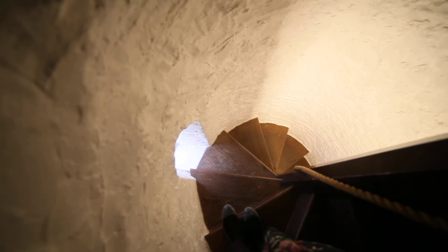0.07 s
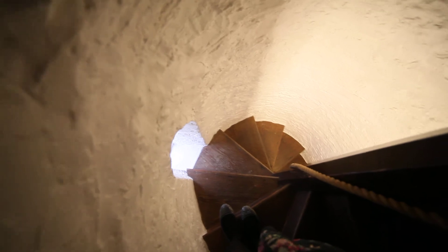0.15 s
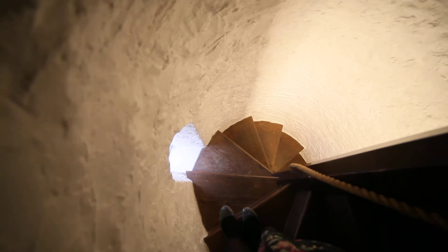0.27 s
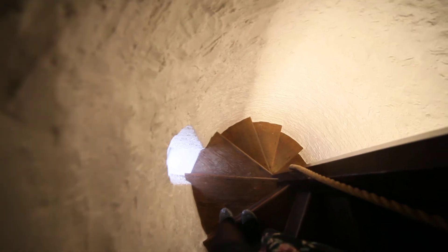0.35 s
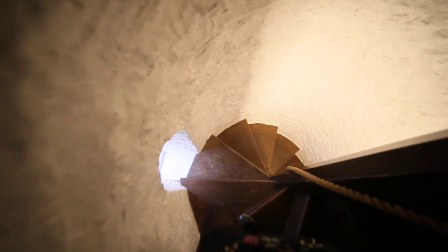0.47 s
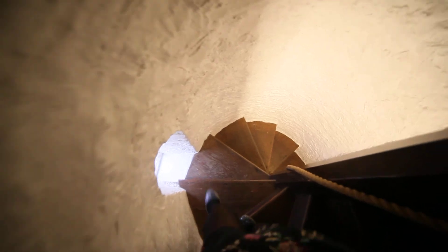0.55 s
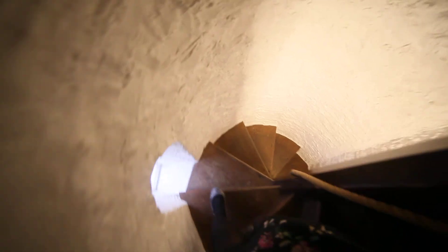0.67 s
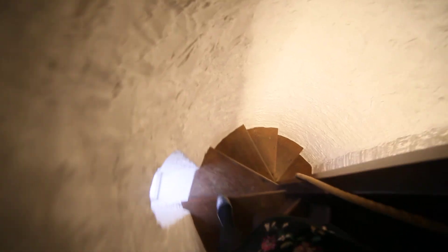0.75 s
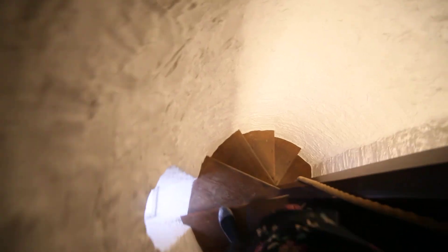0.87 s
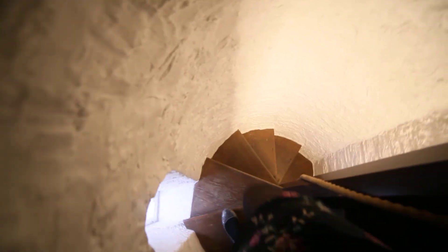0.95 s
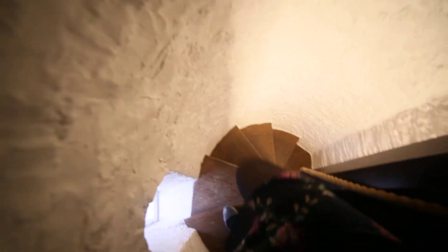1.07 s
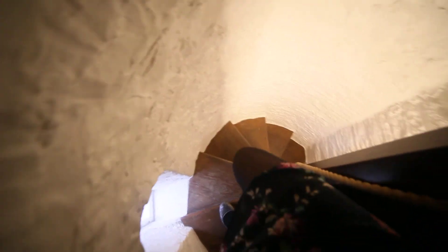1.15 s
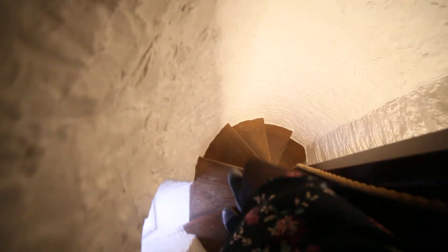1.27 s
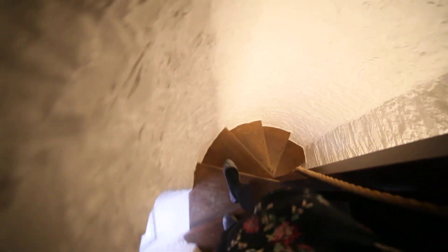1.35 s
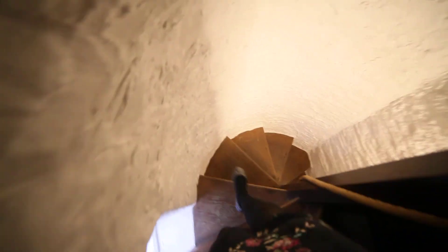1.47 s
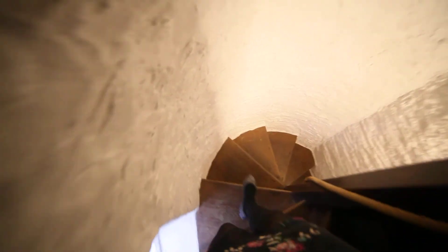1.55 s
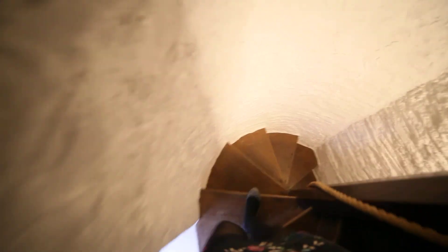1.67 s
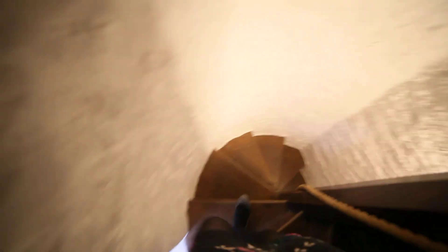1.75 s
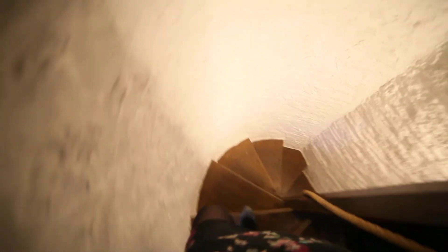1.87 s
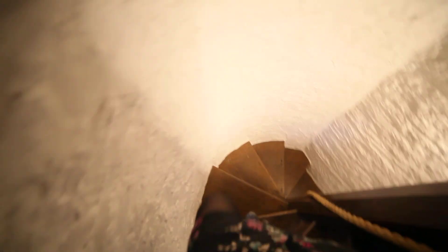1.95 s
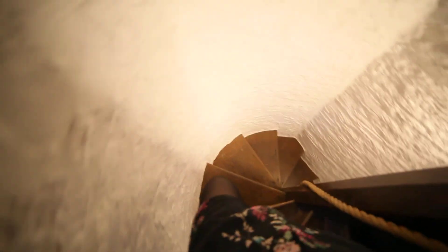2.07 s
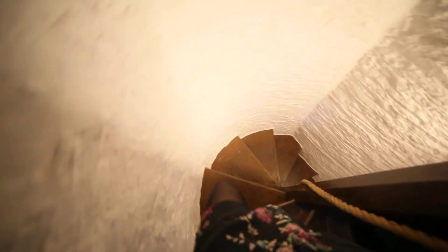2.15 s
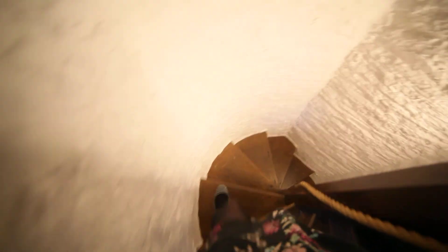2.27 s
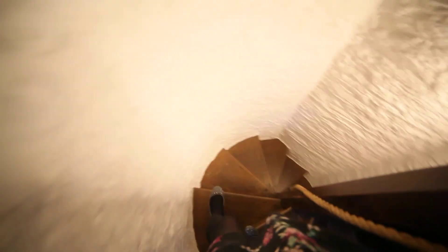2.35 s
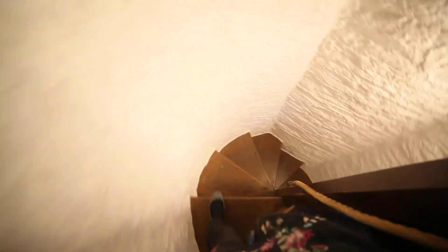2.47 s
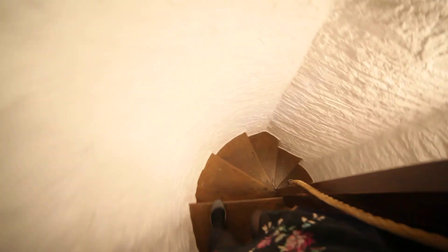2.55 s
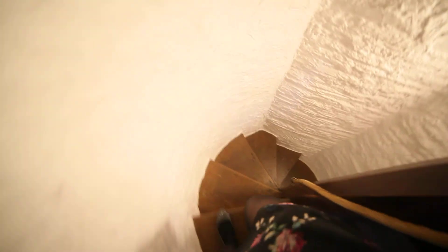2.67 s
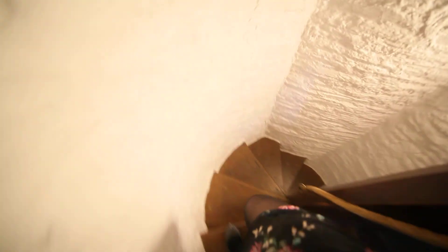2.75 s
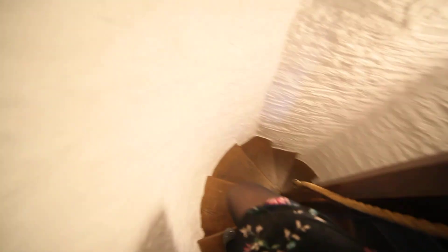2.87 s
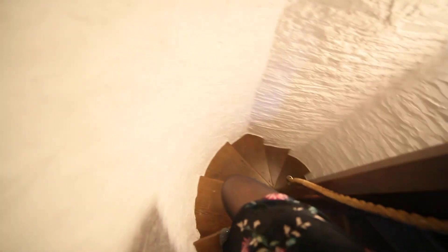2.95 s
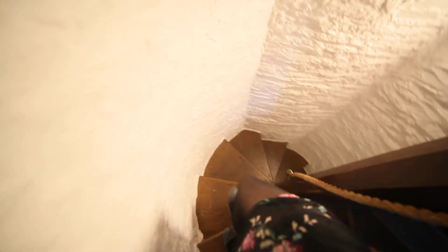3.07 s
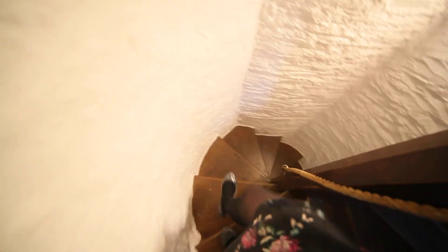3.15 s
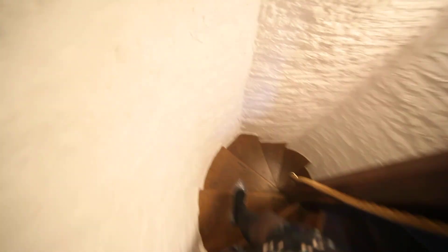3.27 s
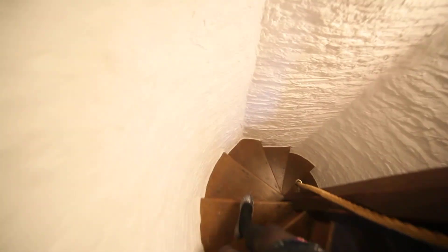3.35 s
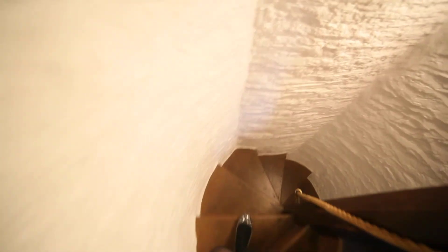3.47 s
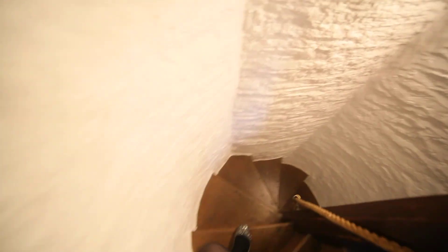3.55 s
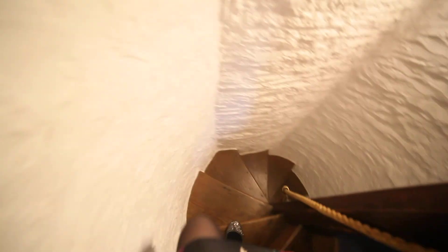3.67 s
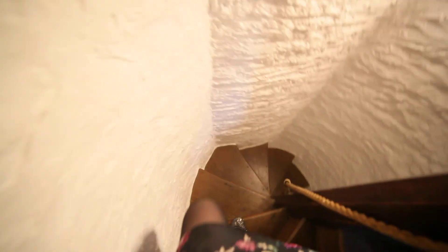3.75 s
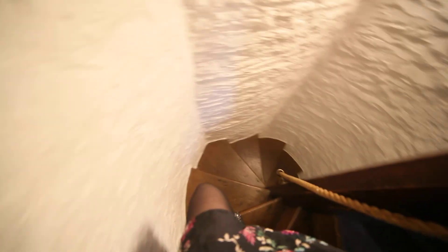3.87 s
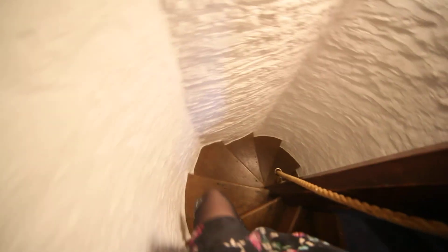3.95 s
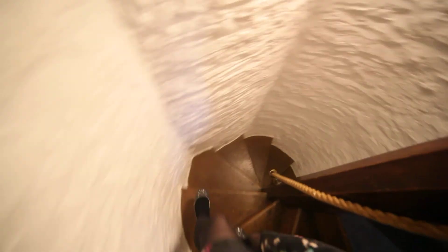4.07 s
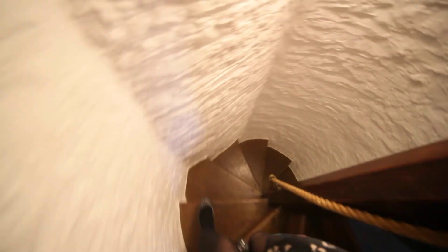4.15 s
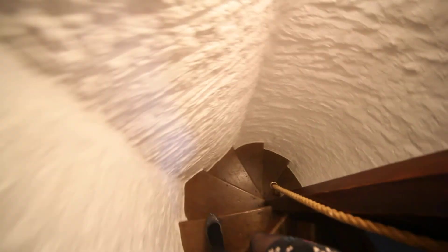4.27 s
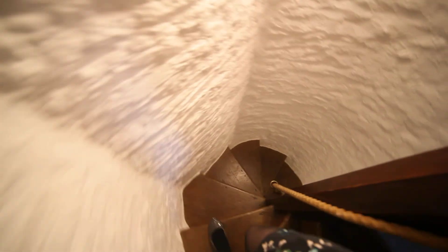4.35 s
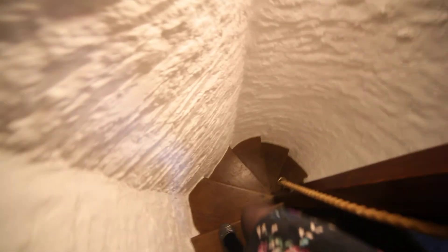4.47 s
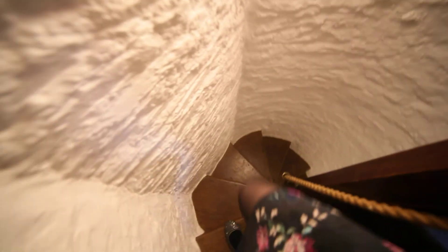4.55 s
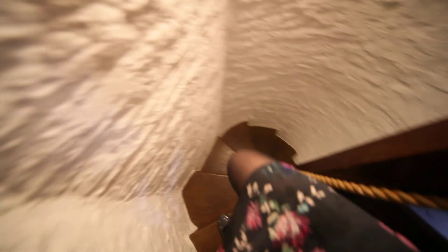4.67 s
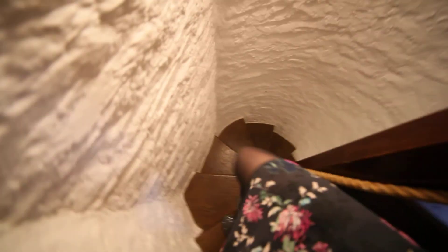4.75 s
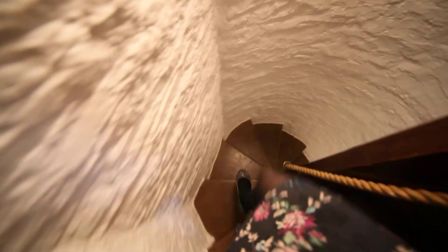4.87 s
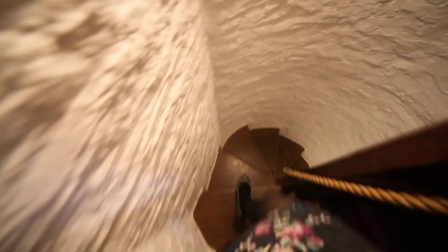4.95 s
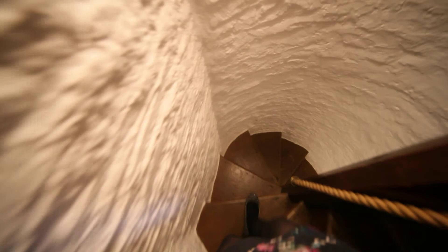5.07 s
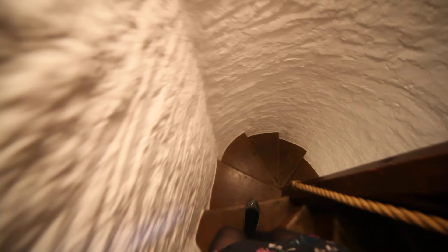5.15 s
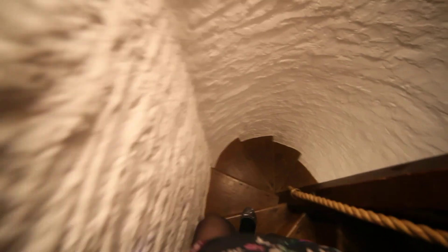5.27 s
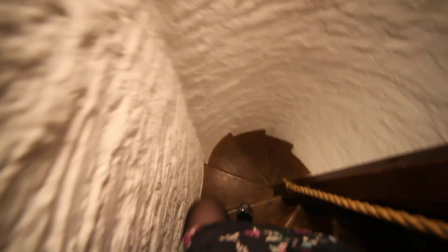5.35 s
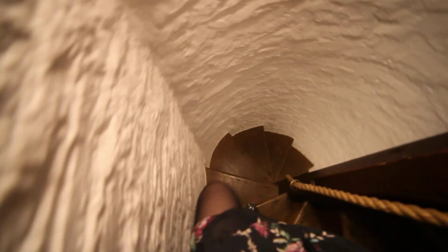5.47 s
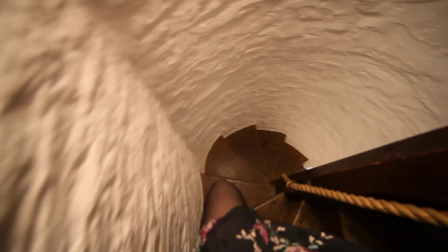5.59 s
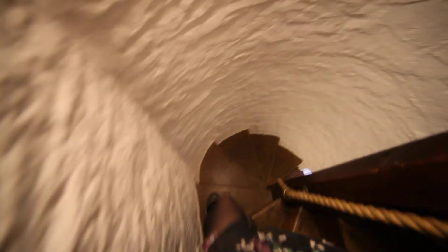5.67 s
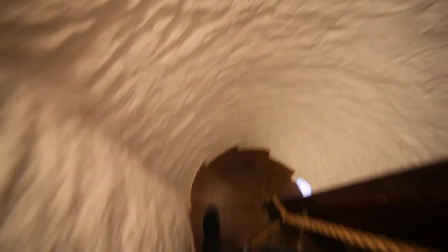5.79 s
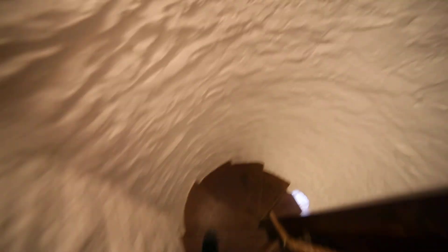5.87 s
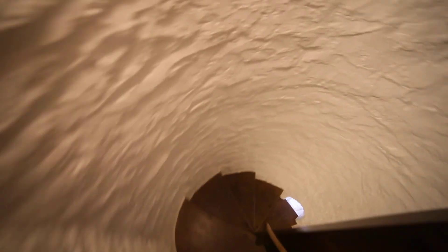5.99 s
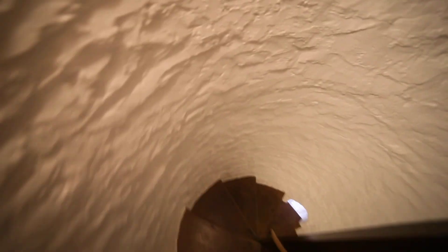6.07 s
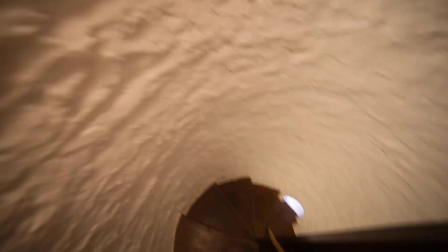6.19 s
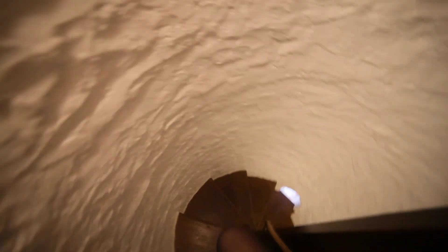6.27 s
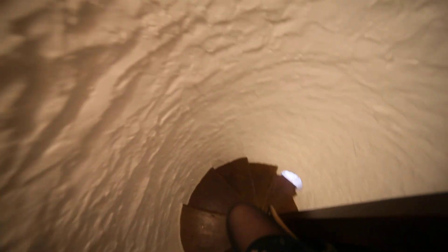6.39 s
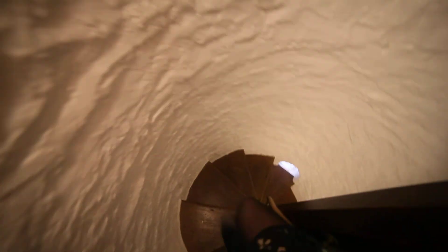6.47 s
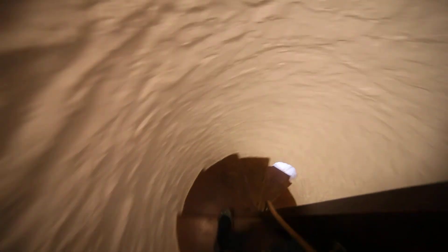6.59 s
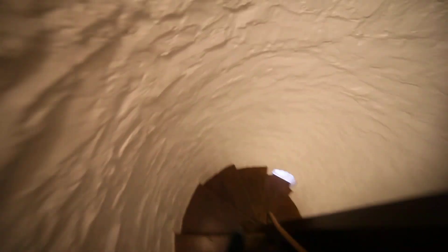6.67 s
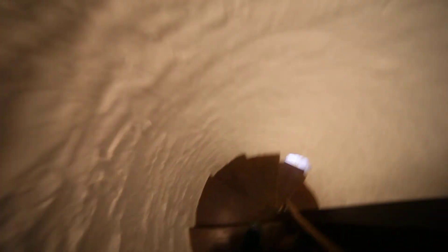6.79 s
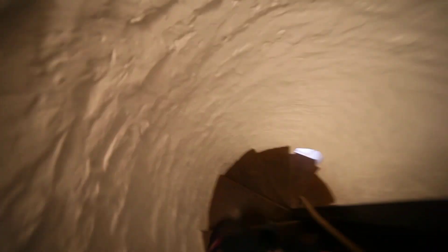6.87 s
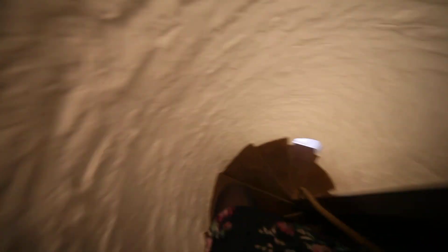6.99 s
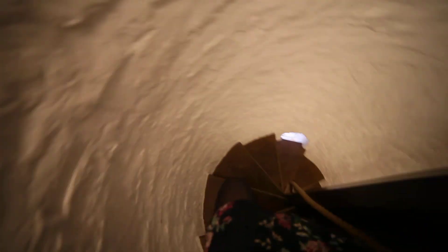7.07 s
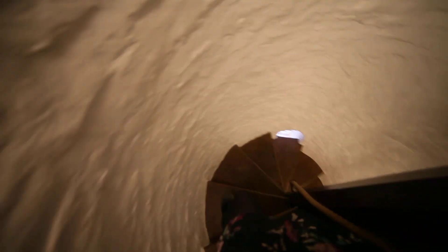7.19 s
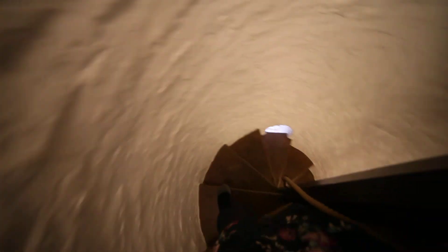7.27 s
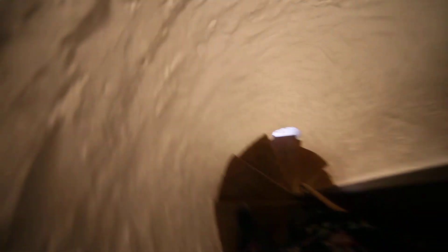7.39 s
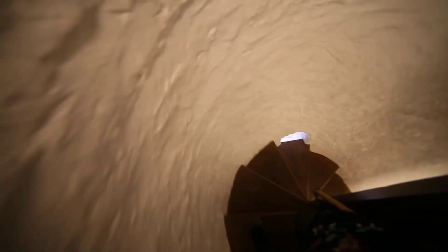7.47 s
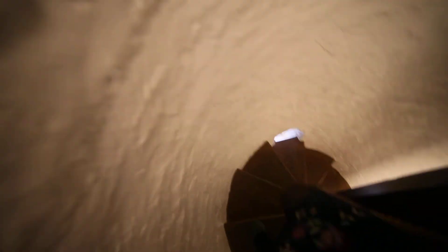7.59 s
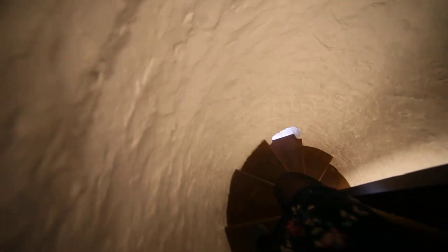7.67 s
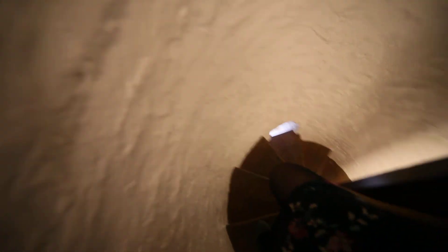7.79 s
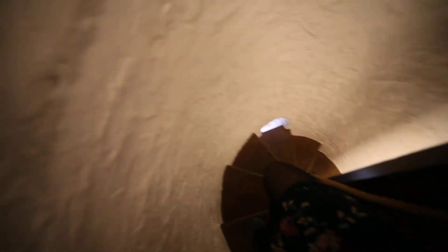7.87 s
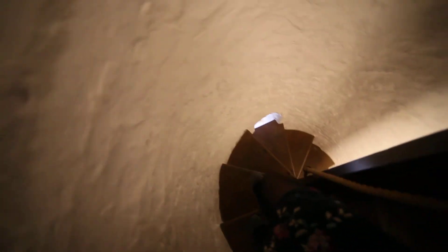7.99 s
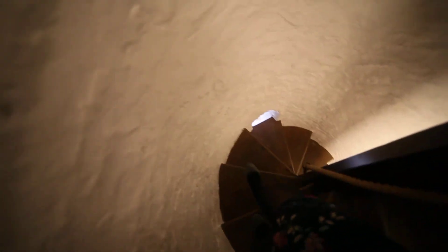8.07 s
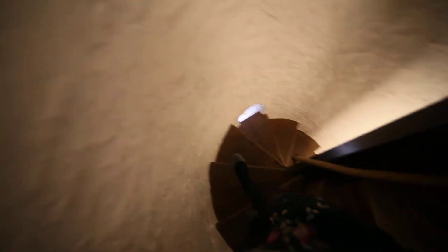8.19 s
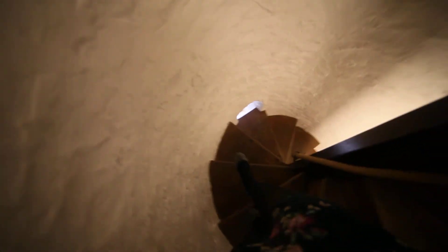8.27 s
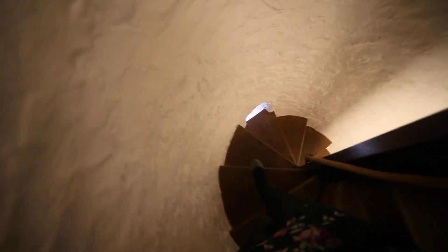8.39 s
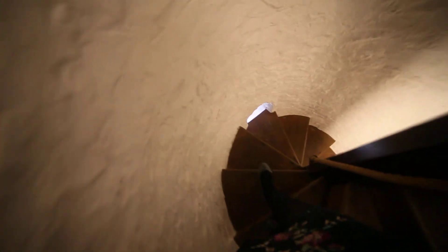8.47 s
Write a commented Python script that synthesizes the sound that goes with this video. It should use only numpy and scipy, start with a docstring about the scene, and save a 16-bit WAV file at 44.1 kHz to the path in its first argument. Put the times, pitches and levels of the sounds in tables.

```python
"""Someone walks down a wooden spiral stair in a narrow plastered tower.
First come a faint hiss, rustling clothes and two rough rubs. From 0.7 s a shoe claps onto a tread nine
times and the staircase booms; softer thuds come as the weight shifts. Along the way small things tick
close by and soles slide on the polished wood, all echoing in the tower. Just after 7 s a swinging skirt
puffs air at the microphone; the last step and one long rub end the scene."""
import sys
import numpy as np
from scipy import signal
from scipy.io import wavfile
from scipy.ndimage import uniform_filter1d

SR = 44100
rng = np.random.default_rng(int(sys.argv[2]) if len(sys.argv) > 2 else 0)


def generate_wav(sig):
    """Save sig (samples, or channels by samples) to the path in sys.argv[1] as 16-bit PCM at SR."""
    pcm = np.round(np.clip(np.atleast_2d(sig).T, -1, 1) * 32767).astype(np.int16)
    wavfile.write(sys.argv[1], SR, pcm)


N = 376169
TIME = np.arange(N) / SR
AGE = TIME[:SR]  # the first second after a blow


def amp(db):
    """Turns decibels into a number to multiply by."""
    return 10 ** (np.asarray(db) / 20)


def unit(x):
    """Scales a sound to a total energy of 1."""
    return x / np.linalg.norm(x)


def evened(x):
    """Scales a sound to an average power of 1."""
    return x / np.sqrt(np.mean(x ** 2) + 1e-20)


def struck(x, db):
    """Scales a blow so that its first 0.06 s have the level db."""
    return amp(db) * x / np.sqrt(np.mean(x[:round(0.06 * SR)] ** 2) + 1e-20)


def value_at(points, hz):
    """Reads between the rows of a (frequency, value) table."""
    freqs, values = np.transpose(points)
    return np.interp(np.log(hz + 1), np.log(freqs), values)


def add(mix, start_s, sound):
    """Mixes a sound in at the given time."""
    part = mix[max(round(start_s * SR), 0):][:len(sound)]
    part += sound[:len(part)]


def coloured(x, colour, size=8192):
    """Makes each frequency louder or softer, as a colour table says."""
    hz = abs(np.fft.fftfreq(size, 1 / SR))
    log_gain = np.log(amp(value_at(colour, hz)))
    response = np.exp(np.conj(signal.hilbert(log_gain)))  # nothing rings before the sound starts
    taps = np.fft.ifft(response).real[:size // 2]
    return signal.fftconvolve(x, taps)[:len(x)]


def band(x, hz, octaves, order=2):
    """Keeps the part of a sound around one pitch."""
    edges = np.minimum(hz * 2 ** (np.array([-.5, .5]) * octaves), SR / 2 - 1)
    return signal.sosfilt(signal.butter(order, edges, "band", fs=SR, output="sos"), x)


def friction(colour, grain_db):
    """Rubbing is countless tiny slips; more grain makes them more uneven."""
    hiss = rng.standard_normal(N)
    roughness = evened(uniform_filter1d(rng.standard_normal(N), size=90))
    return evened(coloured(hiss * amp(grain_db * roughness), colour))


def strokes(table, colour, grain_db):
    """Each rubbing stroke speeds up and slows down again."""
    speed = np.zeros(N)
    for start, length, db in table:
        add(speed, start, amp(db) * np.sin(np.linspace(0, np.pi, round(length * SR))))
    return speed * friction(colour, grain_db)


# tone colour of the background hiss: (frequency [Hz], relative level [dB])
AIR_TONE = [(20, -14), (50, -0.5), (95, -1), (140, -7), (330, -7.5), (560, -13.5), (950, -24.5),
            (1450, -21), (2200, -29), (5000, -24.5), (10000, -30.5), (15800, -37)]
def air():
    """Still air and the microphone hiss softly all the time."""
    return amp(-51) * evened(coloured(rng.standard_normal(N), AIR_TONE))


# steady rustle of the moving body: (time [s], relative level [dB])
BODY_RUSTLE = [(0, -60.5), (.4, -55.5), (.7, -53), (4, -53), (5.7, -48), (7.3, -51.5), (8.5, -53)]
# one leg reaches down, the other swings past: (time from landing [s], width [s], relative level [dB])
LEG_SWINGS = [(-.12, 0.12, -11), (0.189, 0.15, -0.5)]
# tone colour of cloth: (frequency [Hz], relative level [dB])
CLOTH_TONE = [(200, -2), (700, -2), (1600, -2.5), (3000, -5), (5000, -0.5), (7000, -2), (8500, -10.5),
              (10500, -19), (16000, -31)]
def clothes():
    """Cloth rubs faintly all the time and swells twice with each stride."""
    power = amp(np.interp(TIME, *np.transpose(BODY_RUSTLE))) ** 2
    for landing, *_, stride_db in SHOE_LANDINGS:  # listed above steps()
        for delay, width, db in LEG_SWINGS:
            swell = np.exp(-((TIME - landing - delay) / width) ** 2)
            power += amp(stride_db + db) ** 2 * swell
    return amp(-1) * np.sqrt(power) * friction(CLOTH_TONE, grain_db=1.5)


# rough rubs: (start [s], length [s], relative level [dB])
RUBS = [(.268, 0.068, -39), (.375, 0.06, -42), (1.33, 0.1, -51), (2.22, 0.14, -53), (3.145, 0.029, -42),
        (5.745, 0.097, -39), (7.88, 0.48, -40.5)]
# their tone colour: (frequency [Hz], relative level [dB])
RUB_TONE = [(100, -4.5), (330, 6), (700, -1), (1500, 4.5), (3000, 0.5), (5500, 2.5), (7500, 0),
            (10000, -17.5), (16000, -36)]
def rough_rubs():
    """Rubbing on wood and rope makes a grainy scrape."""
    return strokes(RUBS, RUB_TONE, grain_db=2)


# how long the tower echoes: (frequency [Hz], time to fade by 60 dB [s])
TOWER_FADE = [(100, 0.63), (260, 0.51), (700, 0.67), (1800, 0.59), (4800, 0.41), (9000, 0.53), (16000, 0.1)]
def tower_echo():
    """Many reflections blur into one echo; each frequency fades at its own speed."""
    hz, t, spectrum = signal.stft(rng.standard_normal(SR), SR, nperseg=256)
    fade = amp(-60 * t / value_at(TOWER_FADE, hz)[:, None])
    _, echo = signal.istft(spectrum * fade, SR, nperseg=256)
    return unit(echo[:SR])


# first echoes off the round wall: (delay [s], relative level [dB])
WALL_ECHOES = [(.003, -14), (.0062, -11), (.0095, 2), (.013, 3.5), (.024, -6)]
def sound_path(direct_db, near_fade_s, tower_db, walls_db):
    """A click reaches the listener straight, off the near walls, then round the tower."""
    scatter = (rng.random(SR) < 3000 / SR) * rng.standard_normal(SR)  # about 3000 tiny echoes a second
    near = scatter * amp(-60 * AGE / near_fade_s) * (1 - np.exp(-AGE / 0.00042))
    path = unit(near) + amp(tower_db) * tower_echo()
    path[0] += amp(direct_db)
    for delay, db in WALL_ECHOES:  # the distances change from step to step
        path[round(delay * rng.uniform(.8, 1.2) * SR)] += amp(walls_db + db)
    return path


def ring(notes, spread_db, detune):
    """Struck wood rings with fading notes; their mix varies by chance, as the foot's spot does."""
    out = np.zeros(SR)
    for hz, db, fade_s in notes:
        louder, higher, flip = rng.standard_normal(3)
        level = amp(db + spread_db * louder - 60 * AGE / fade_s)
        out += level * np.sign(flip) * np.sin(2 * np.pi * hz * (1 + detune * higher) * AGE)
    return out


def main_note(hz, path, fade_s, rise_s, echo_db):
    """The strongest note under the foot, with its echoes."""
    tone = np.sin(2 * np.pi * hz * AGE) * amp(-60 * AGE / fade_s) * (1 - np.exp(-AGE / rise_s))
    echo = signal.fftconvolve(tone, path)[:SR]
    return unit(unit(tone) + amp(echo_db) * unit(echo))


# notes of the whole staircase: (pitch [Hz], relative level [dB], time to fade by 60 dB [s])
STAIRCASE_NOTES = [(109.5, 2.5, 0.3), (118.9, -12, 0.56), (207, -6, 0.14), (147.6, -24, 0.44)]
def staircase_boom():
    """The heavy frame takes a moment to move, then booms."""
    swell = 1 - np.exp(-AGE / 0.051)
    return ring(STAIRCASE_NOTES, spread_db=4, detune=0.013) * swell


# notes of one tread: (pitch [Hz], relative level [dB], time to fade by 60 dB [s])
TREAD_NOTES = [(231, -9, 0.15), (288.7, -7, 0.25), (313, -3, 0.24), (363, -16, 0.71), (492, -9.5, 0.59),
               (559, 3.5, 0.4), (843, -25, .25), (1037, -18, 0.53), (1144, -14, 0.44), (1220, -24, 0.27),
               (2497, -33, 0.23), (2810, -2, 0.21)]
def tread_ring():
    """The tread, the board under the foot, rings when struck."""
    return unit(ring(TREAD_NOTES, spread_db=5.5, detune=0.0063))


def tread_thud(wood, hz, note_db):
    """The weight pushes on the tread: a low thud with one note in it."""
    path = sound_path(direct_db=-6, near_fade_s=0.2, tower_db=1, walls_db=-11)
    thud = unit(band(path + amp(-13) * wood, hz, octaves=0.84))
    return thud + amp(note_db) * main_note(hz, path, fade_s=0.15, rise_s=0.0032, echo_db=-7.5)


def sole_clack(wood, hz, hollow_db):
    """The sole claps onto the wood with a short, hollow ring."""
    path = sound_path(direct_db=-12, near_fade_s=0.33, tower_db=-5, walls_db=-23)
    clack = unit(band(path + amp(-10.5) * wood, hz, octaves=1.39))
    return clack + amp(hollow_db) * main_note(hz, path, fade_s=0.023, rise_s=0.0045, echo_db=1)


# tone colour of the snap: (frequency [Hz], relative level [dB])
SNAP_TONE = [(400, -64), (1200, -5.5), (2000, -0.5), (3400, -2.5), (4900, -1.5), (6300, -7), (7600, -12.5),
             (10000, -27), (16000, -48)]
def sole_snap(wood, hz):
    """Hard contact makes a bright snap, coloured by the part of the sole that lands."""
    path = sound_path(direct_db=-8, near_fade_s=0.22, tower_db=-3, walls_db=-22)
    snap = coloured(path + amp(-5.5) * wood, SNAP_TONE)
    return unit(snap) + amp(-7) * unit(band(snap, hz, octaves=0.53, order=1))


def footfall(boom_db, thud_db, thud_hz, clack_db, clack_hz, hollow_db, snap_db, snap_hz, note_db):
    """One blow: the staircase booms, the tread thuds, the sole clacks and snaps."""
    boom = struck(staircase_boom(), boom_db)
    wood = tread_ring()
    thud = struck(tread_thud(wood, thud_hz, note_db), thud_db)
    clack = struck(sole_clack(wood, clack_hz, hollow_db), clack_db)
    snap = struck(sole_snap(wood, snap_hz), snap_db + 2)
    return boom + thud + clack + snap


# a shoe lands on the next tread: (time [s], boom level [dB], thud level [dB], thud pitch [Hz],
# clack level [dB], clack pitch [Hz], hollow ring against the clack [dB], relative snap level [dB],
# snap pitch [Hz], relative rustle level [dB])
SHOE_LANDINGS = [(0.7127, -29.5, -19.5, 288, -26, 1160, -7, -28.5, 2950, -45.5),
                 (1.5969, -30, -24.5, 344, -25, 840, -19, -37, 3960, -40.5),
                 (2.512, -29.5, -25.5, 325, -19, 1040, 0.5, -30.5, 4170, -43),
                 (3.3813, -26.5, -18, 330, -25, 918, -5.5, -30.5, 4630, -45),
                 (4.2654, -29, -20.5, 314, -24, 910, -3, -29, 3600, -44.5),
                 (5.0495, -25, -24, 322, -26.5, 1040, -21, -33.5, 3400, -39),
                 (5.879, -26.5, -20, 276, -24.5, 1290, -1.5, -28, 2230, -45),
                 (6.7183, -23.5, -21.5, 215, -24, 1066, -11.5, -31.5, 2840, -43),
                 (7.4085, -34.5, -28.5, 333, -20, 1046, -4.5, -28, 2500, -44.5)]
# the weight shifts: (time [s], boom level [dB], thud level [dB], thud pitch [Hz], clack level [dB],
# clack pitch [Hz], relative snap level [dB])
WEIGHT_SHIFTS = [(0.623, -56, -48, 271, -50.5, 580, -64), (0.895, -59, -25.5, 257.5, -40, 1020, -62),
                 (1.783, -57, -35, 297.5, -57, 900, -61), (1.916, -42, -48, 280, -52, 700, -57),
                 (2.454, -54, -42.5, 385, -53, 970, -58), (2.678, -51, -25.5, 358, -32.5, 890, -46),
                 (3.57, -44.5, -34, 314, -40.5, 845, -63), (3.905, -75, -51, 300, -52.5, 570, -77),
                 (4.173, -46, -48, 287, -74, 977, -66), (4.4422, -44, -26, 363, -28, 660, -66),
                 (5.217, -46, -25, 291, -39, 830, -62), (5.379, -48.5, -38.5, 312, -43.5, 623, -57),
                 (6.014, -62, -25, 347, -27, 626, -41.5), (6.7857, -40, -18.5, 257, -32.5, 840, -33.5),
                 (6.928, -42.5, -32.5, 235, -38.5, 610, -54), (7.5722, -51.5, -22.5, 296, -29, 710, -36),
                 (7.731, -43.5, -25.5, 269, -37.5, 900, -47)]
def steps():
    """Shoes land hard on the treads, and the shifting weight adds softer thuds."""
    out = np.zeros(N)
    for start, *blow, _ in SHOE_LANDINGS:
        add(out, start, footfall(*blow, note_db=-6))
    # a sole already down rings little and snaps dully; its soft push brings out one note of the tread
    for start, *blow, snap_db in WEIGHT_SHIFTS:
        add(out, start, footfall(*blow, hollow_db=-13, snap_db=snap_db, snap_hz=2280, note_db=0))
    return out


# small ticks close by, and at 3.147 s a shoe brushing the wood: (time [s], peak level [dB], pitch [Hz], time to
# fade by 60 dB [s])
SMALL_TICKS = [(1.183, -32, 5050, 0.011), (1.986, -29, 3650, 0.0058), (2.455, -29.5, 5560, .03),
               (3.147, -28, 5200, .07), (3.835, -32, 5050, 0.035), (4.663, -30, 5830, 0.0061),
               (4.78, -31, 2040, 0.015), (4.9065, -36, 3370, 0.0072), (7.0722, -25, 5560, 0.078),
               (7.14, -24.5, 4640, 0.063), (7.2973, -32.5, 6200, 0.013)]
def ticks():
    """Small things touch, each with a bright tick that dies at once; at 3.147 s a shoe brushes the wood with
    the same sharp tick."""
    out = np.zeros(N)
    for start, db, hz, fade_s in SMALL_TICKS:
        burst = rng.standard_normal(SR) * amp(-60 * AGE / fade_s)
        tick = band(burst, hz, octaves=0.62)
        add(out, start, amp(db) * tick / abs(tick).max())
    return out


# sliding soles: (start [s], length [s], relative level [dB])
SOLE_SLIDES = [(1.7, 0.089, -39.5), (1.81, 0.095, -46.5), (3.146, 0.048, -48.5), (3.49, 0.14, -43.5),
               (5.14, 0.15, -39), (6.22, 0.086, -52), (6.53, 0.12, -52)]
# their tone colour: (frequency [Hz], relative level [dB])
SLIDE_TONE = [(500, -61), (2500, -11), (4300, -0.5), (6000, 5), (7500, 1), (10000, -10.5), (16000, -24)]
def sole_slides():
    """Soles slide over polished treads with a smooth, high hiss."""
    return strokes(SOLE_SLIDES, SLIDE_TONE, grain_db=-0.5)


# puffs of air: (start [s], length [s], level [dB])
SKIRT_PUFFS = [(7.172, 0.041, -39), (7.225, 0.066, -40.5), (7.28, .07, -41)]
# their tone colour: (frequency [Hz], relative level [dB])
PUFF_TONE = [(20, -17), (50, 7), (85, -1), (160, -37), (500, -45), (3000, -77)]
def skirt_puffs():
    """The swinging skirt pushes air onto the microphone, making a low rumble."""
    return strokes(SKIRT_PUFFS, PUFF_TONE, grain_db=2.5)


def scene():
    """All the sounds in the tower, the same on the left and the right."""
    rubs = rough_rubs()
    slides = sole_slides()
    close = ticks() + skirt_puffs()
    into_tower = amp(-2.5) * rubs + amp(-3.5) * slides + amp(-11) * close
    echoes = signal.fftconvolve(into_tower, tower_echo())[:N]
    mono = air() + steps() + clothes() + amp(1) * rubs + amp(3.5) * slides + close + echoes
    return np.array([mono, mono])


def record(dry):
    """The recorder cuts off the highest treble, above 15900 Hz."""
    treble_cut = signal.firwin(511, 15900, window=("kaiser", 9), fs=SR)
    return signal.oaconvolve(dry, treble_cut[None], "same", axes=1)


dry = scene()
out = record(dry)
generate_wav(out)
```